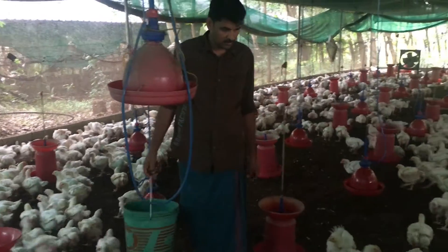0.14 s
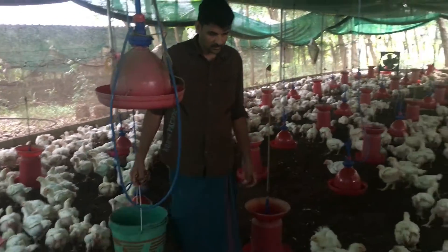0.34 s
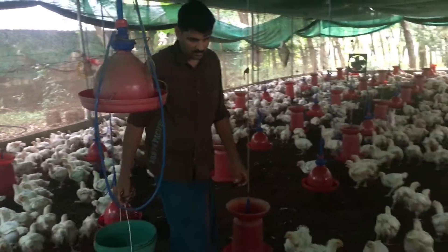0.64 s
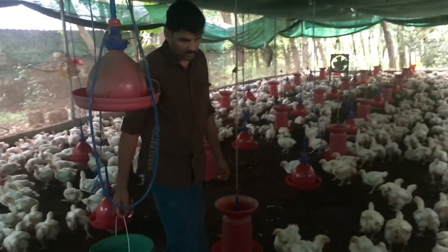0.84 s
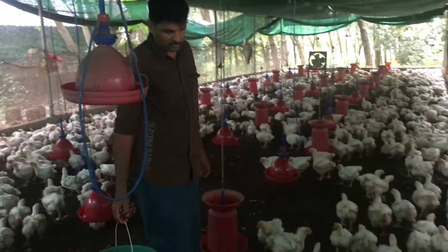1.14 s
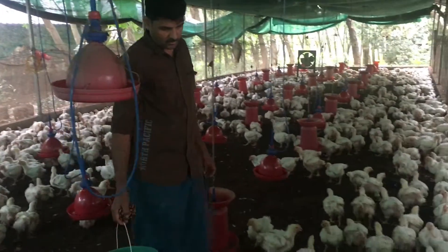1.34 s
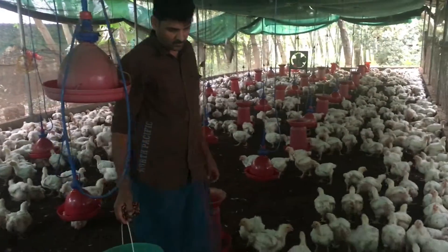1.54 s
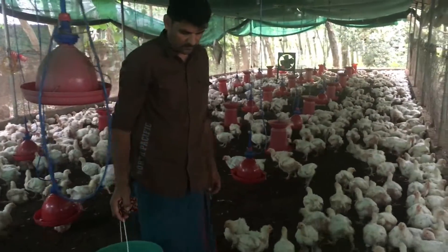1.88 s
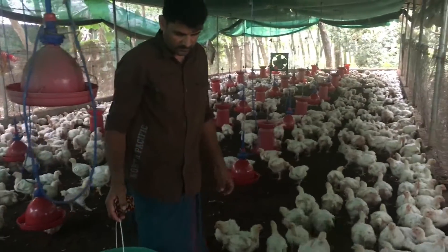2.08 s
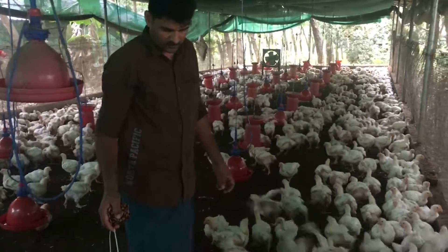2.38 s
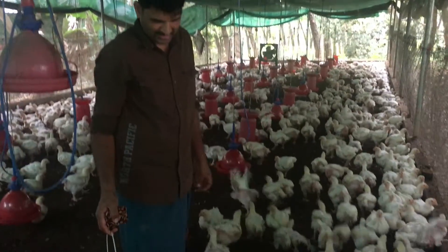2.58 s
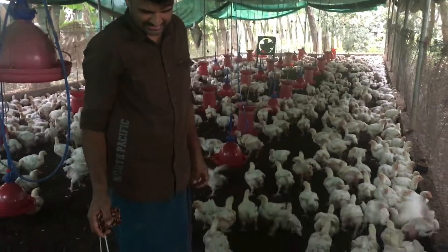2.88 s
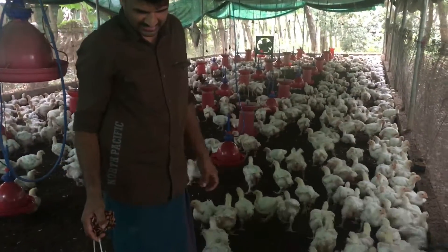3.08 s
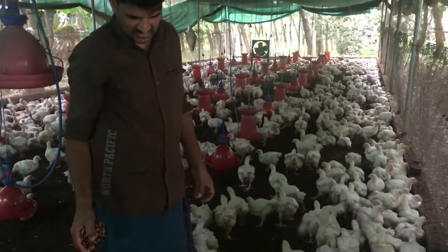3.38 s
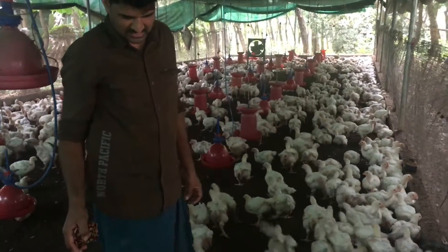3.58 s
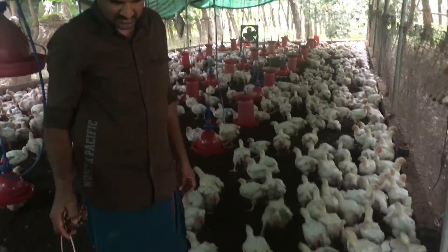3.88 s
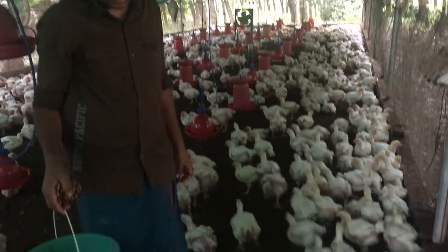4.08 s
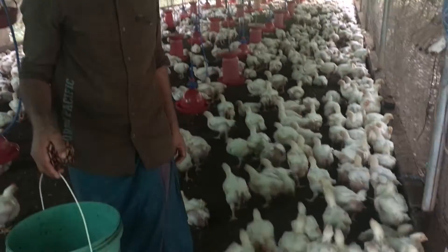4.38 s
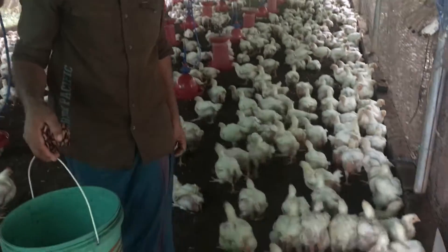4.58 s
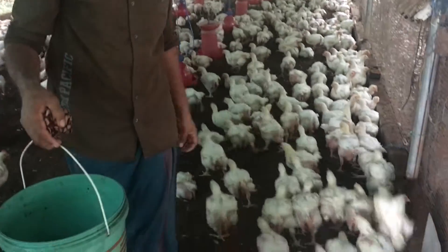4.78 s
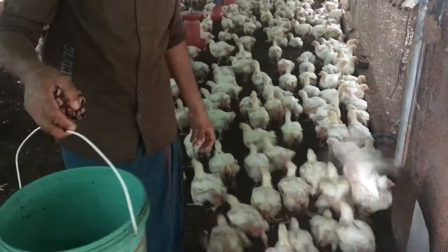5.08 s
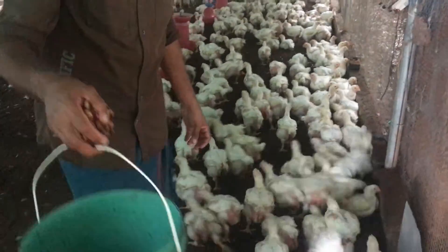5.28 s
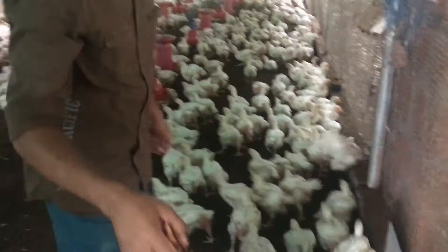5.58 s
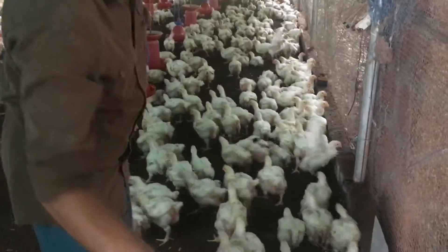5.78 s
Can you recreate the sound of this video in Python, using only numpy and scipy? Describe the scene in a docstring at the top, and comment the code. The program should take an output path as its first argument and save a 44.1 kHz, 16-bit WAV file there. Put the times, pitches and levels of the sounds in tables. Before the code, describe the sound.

A big flock of young chickens peeps in an overlapping chorus, with hoarse squawks, bursts of scuffling feet and wings, and small dry ticks.

```python
"""A large flock of young chickens in an open-sided shed with a litter floor.
Hundreds of short gliding whistles overlap into a chorus; single peeps and harmonic, hoarse
squawks stand above it. Now and then birds scatter, feet and wings scuffling as gritty noise;
litter and feathers crackle, claws and beaks tick. A far wash, low rumble and short echo lie behind."""
import sys
import numpy as np
from scipy import signal
from scipy.fft import rfft, irfft, next_fast_len
from scipy.io import wavfile
from scipy.ndimage import uniform_filter1d

SR = 44100
rng = np.random.default_rng(int(sys.argv[2]) if len(sys.argv) > 2 else 0)


def volts_from_db(level):
    """Convert decibel levels to linear amplitude ratios."""
    exponent = np.asarray(level, float) / 20
    return 10 ** exponent


def wav_record(signal):
    """Record a signal, one row per channel, as 16-bit PCM in the file named by sys.argv[1]."""
    frames = np.transpose(np.atleast_2d(signal))
    bounded = np.clip(frames, -1, 1)
    # unit amplitude maps onto the largest positive 16-bit level
    quanta = np.round(bounded * 32767).astype(np.int16)
    wavfile.write(sys.argv[1], SR, quanta)


N = 261954

# breath noise in the calls, relative density: (frequency [Hz], level [dB])
BREATH_SPECTRUM = [(380, -40), (650, -1), (1000, -22), (1600, 6), (2800, 0), (4500, -26.5), (7000, -18),
                   (12000, -47)]


def evened(x):
    """Scales x to rms 1."""
    return x / np.sqrt(np.mean(x ** 2) + 1e-20)


def spectrum_at(points, hz):
    """Table level in dB at hz, interpolated over log frequency."""
    table_hz, level_db = np.transpose(points)
    return np.interp(np.log(hz + 1), np.log(table_hz + 1), level_db)


def curve(rows, column):
    """One column of a time table at every sample."""
    rows = np.asarray(rows)
    return np.interp(np.arange(N) / SR, rows[:, 0], rows[:, column])


def add(mix, time_s, sound):
    """Adds sound to mix in place from time_s, cut at the end of mix."""
    part = mix[round(time_s * SR):][:len(sound)]
    part += sound[:len(part)]


def coloured(x, points):
    """Shapes x by a spectrum table, then scales it to rms 1."""
    size = next_fast_len(len(x))
    gain = volts_from_db(spectrum_at(points, np.fft.rfftfreq(size, 1 / SR)))
    return evened(irfft(rfft(x, size) * gain, size)[:len(x)])


def wander(count, span_s):
    """Moving average of white noise over span_s: smooth chance of rms 1."""
    size = max(int(span_s * SR), 2)
    return uniform_filter1d(rng.standard_normal(count + size), size)[:count] * np.sqrt(size)


def grit(grains_per_s, spread_db, hiss):
    """Sparse grains of uneven size over a bed of hiss."""
    size = volts_from_db(spread_db * np.minimum(rng.exponential(1, N), 3)) * rng.standard_normal(N)
    grains = size * (rng.random(N) < grains_per_s / SR)
    return evened(grains) + hiss * rng.standard_normal(N)


def peaked(time_s, peak_db, rise_s, fall_s, shape=1):
    """Gain that peaks at time_s, 10 dB down rise_s before and fall_s after; shape 1 = pointed, 2 = round."""
    late_s = np.arange(N) / SR - time_s
    return volts_from_db(peak_db - 10 * np.where(late_s < 0, -late_s / rise_s, late_s / fall_s) ** shape)


def liveliness(column):
    """Gain of the chorus (column 1) or the rustle (2): steady bed and flurries added as power."""
    # steady bed: (time [s], chorus level [dB], rustle level [dB])
    bed = [(0, -34, -50.5), (.75, -32, -50), (1.08, -30, -47.5), (1.34, -32.5, -51), (1.8, -29.5, -44),
           (2.06, -36, -44), (2.23, -31.5, -35.5), (2.65, -24.5, -35.5), (2.72, -41, -48), (2.81, -24, -38),
           (3.065, -31, -40), (3.09, -24, -40), (3.37, -51, -48), (3.72, -48, -53), (4.3, -41.5, -52),
           (4.66, -41, -52), (4.91, -49, -55), (5.94, -44.5, -46)]
    # groups flaring up: (time [s], chorus peak [dB], rustle peak [dB], fall by 10 dB [s])
    flurries = [(.04, -26, -40, 0.08), (.22, -29, -48, .05), (.28, -28, -42, .09), (.48, -30.5, -48.5, .05),
                (.56, -30, -47, .06), (.69, -28, -43, 0.08), (1.19, -29, -42, 0.11),
                (1.63, -29.5, -46.5, .08), (1.9, -26, -27.5, 0.0361), (2.0, -27, -22, 0.03),
                (2.15, -21, -26, 0.0552), (3.3, -34, -41, .06), (3.5, -30, -43, .07),
                (3.66, -31, -60, .035), (3.84, -35.5, -56, 0.15), (4.18, -32, -44, 0.16),
                (4.41, -27, -40.5, 0.05), (4.53, -30.5, -44.5, .06), (4.61, -34, -41, .04),
                (4.73, -31, -44, 0.04), (4.849, -28.5, -60, .035), (5.0, -33, -32, .06),
                (5.07, -33, -34, 0.08), (5.19, -38, -33, 0.02), (5.35, -28, -36, 0.07),
                (5.61, -33.5, -46, 0.08), (5.77, -34, -44.5, 0.1)]
    power = volts_from_db(curve(bed, column)) ** 2
    for row in flurries:
        fall_s = row[3]
        power = power + peaked(row[0], row[column], .7 * fall_s, fall_s, shape=1.6) ** 2
    return np.sqrt(power)


def peep(from_hz, to_hz, length_ms, overtone_db, breath):
    """A gliding, shaky whistle with two overtones and breath, quick to rise and slower to fade."""
    count = int(1.7 * length_ms * SR / 1000)  # room for the faint ends
    u = np.arange(count) / count
    shake = 1 + .018 * wander(count, .005)
    bow = 1 + .05 * (np.sin(np.pi * u) - 1)  # pitch sags 5 % at both ends
    glide_hz = from_hz + (to_hz - from_hz) * u
    phase = 2 * np.pi * np.cumsum(glide_hz * bow * shake) / SR
    overtones = np.sin(2 * phase) + volts_from_db(-10) * np.sin(3 * phase)
    tone = np.sin(phase) + volts_from_db(overtone_db) * overtones
    flutter = 1 + .25 * wander(count, .003)
    envelope = np.sin(np.pi * u ** 0.77) ** 2.06
    return (tone * flutter + breath[:count]) * envelope


def chorus(count=800):
    """Many birds at all distances; most peep low, some higher, a few cluck below."""
    out = np.zeros(N)
    breath = .13 * coloured(rng.standard_normal(N + SR), BREATH_SPECTRUM)
    for when, kind, pitch, glide, length, size, over in rng.random((count, 7)):
        if kind < .25:  # high peep
            pitch_factor, drop_db, fall = 1.6, 4, .76
        elif kind > .86:  # cluck
            pitch_factor, drop_db, fall = .64, 5, .9
        else:
            pitch_factor, drop_db, fall = 1, 0, .76
        hz = (1120 + 750 * pitch ** 1.4) * pitch_factor
        to_hz = hz * (fall + .22 * glide)
        level_db = -3 * np.log(size + 0.031) - drop_db
        call = peep(hz, to_hz, 11 + 30 * length ** 1.5, -4 - 18 * over, breath[int(when * N):])
        add(out, when * N / SR, volts_from_db(level_db) * call)
    # small throats, overtones dulled by distance
    out = signal.lfilter(*signal.butter(3, [620, 3500], "band", fs=SR), out)
    short_rms = np.sqrt(uniform_filter1d(out ** 2, 4500) + 1e-9)
    return liveliness(1) * out / short_rms  # liveliness alone sets the loudness


def near_peeps():
    """Single peeps that stand out; low ones are reedy, high ones purer. A few high rows sound together with a
    near cry, as extra lines above its harmonics."""
    # (time [s], level [dB], glide from [Hz], glide to [Hz] (both before the bow), nominal length [ms])
    peeps = [(.092, -11, 1470, 1420, 16), (.113, -12, 1440, 1400, 6), (0.127, -18, 1560, 1320, 12.5),
             (.212, -22, 1260, 1220, 9), (.285, -22, 1900, 1700, 14), (0.261, -17, 1440, 1390, 8.4),
             (0.466, -23.5, 1302, 1574, 31), (0.563, -25.5, 2406, 2290, 23), (0.685, -26, 1570, 1450, 22),
             (.708, -25, 1180, 1080, 20), (0.974, -27, 2274, 1820, 35), (1.078, -25, 1160, 1200, 16),
             (1.181, -20.5, 1216, 1224, 31), (1.525, -28, 1385, 1158, 58), (1.826, -25.5, 1220, 1183, 29),
             (1.892, -12.5, 2430, 2240, 15.5), (1.89, -19, 1860, 1850, 17), (2.262, -24, 2650, 2450, 25),
             (2.272, -22, 2000, 1900, 30), (2.326, -22, 1307, 1600, 45), (2.424, -21, 1622, 1360, 27),
             (2.68, -23, 2050, 2250, 16), (2.762, -23, 1950, 1950, 10), (2.793, -16, 1620, 1500, 26),
             (2.835, -18, 1324, 1514, 20), (2.864, -24, 1407, 1486, 31), (2.905, -18, 1350, 1250, 18),
             (2.985, -19, 1450, 1230, 26), (3.062, -24, 2050, 2180, 12), (3.113, -21, 3350, 3120, 12),
             (3.336, -19.5, 1450, 1344, 27.6), (3.41, -26, 1350, 1330, 22), (3.46, -25, 2550, 2600, 20),
             (3.471, -19, 1314, 1496, 25), (3.633, -26.5, 1098, 1370, 18), (3.678, -25, 1750, 1600, 14),
             (3.757, -26, 1435, 1294, 29), (3.835, -24.5, 1805, 1670, 15.6), (3.927, -16.5, 1467, 1544, 25),
             (4.206, -22.5, 2703, 3050, 19.7), (4.208, -19.5, 1668, 1864, 31.4),
             (4.213, -15.5, 1494, 1544, 11.2), (4.356, -25, 1277, 1263, 32), (4.394, -23.5, 2730, 2856, 19),
             (4.523, -19.5, 1357, 1355, 15.6), (4.719, -21, 1395, 1414, 13.3),
             (4.835, -21.5, 1226, 1150, 22), (4.963, -18.5, 3050, 3500, 33), (4.985, -23, 2750, 2650, 14),
             (5.058, -19, 1240, 1290, 14), (5.185, -24, 2120, 1950, 22), (5.218, -20, 1420, 1380, 9),
             (5.22, -22, 1740, 1680, 9), (5.285, -25, 1800, 1760, 12), (5.362, -17.5, 1790, 1720, 7),
             (5.401, -14, 1180, 1060, 9), (5.436, -22, 2983, 2790, 17), (5.485, -24, 1870, 1925, 16.6),
             (5.53, -29, 1660, 1640, 28), (5.597, -22, 1087, 1026, 13), (5.634, -27, 1174, 1120, 12.3),
             (5.665, -28, 1850, 1750, 18), (5.755, -27, 2050, 1950, 14)]
    out = np.zeros(N)
    breath = .25 * coloured(rng.standard_normal(N), BREATH_SPECTRUM)
    for time_s, level_db, from_hz, to_hz, length_ms in peeps:
        overtone_db = -13.5 - 18 * np.log2(from_hz / 1310)  # -18 dB per octave of pitch
        own_breath = np.roll(breath, -round(time_s * SR))[:SR // 5]
        call = peep(from_hz, to_hz, length_ms, overtone_db, own_breath)
        add(out, time_s - .3 * length_ms / 1000, volts_from_db(level_db) * call)
    return out


def squawk(length_s, top_at, top_db, top_hz, top_rough, top_bright_db, open_hz, lift_db, dull_db):
    """A harmonic cry through the throat; roughness shakes pitch and level, adds half lines and breath."""
    # throat response: (frequency [Hz], level [dB])
    throat = [(350, -60), (600, -3), (785, -6), (1060, -14), (1500, 2), (2200, -11), (3410, -18.5),
              (3900, -13.5), (4650, -26), (6960, -19), (7650, -24), (15000, -35)]
    t = np.arange(0, length_s, 1 / SR)
    count = len(t)
    u = t / length_s - top_at  # 0 where the cry tops out
    before, after = -u / top_at, u / (1 - top_at)

    def arch(first, top, last):
        """Straight climb to the top, held there before it sags."""
        return top + np.where(u < 0, (first - top) * before, (last - top) * abs(after) ** 1.8)

    effort_db = top_db + arch(-2.5, 0, -7.5)
    bright_db = top_bright_db + dull_db * np.clip(after, 0, 1)
    hz = top_hz * arch(.97, 1, .915)
    rough = np.clip(top_rough + arch(.25, 0, 0.046), 0, 1)
    beak_hz = arch(2950, open_hz, 0.93 * open_hz)
    jitter = .022 * wander(count, .004) + .02 * wander(count, .025)
    cycles = np.cumsum(hz * (1 + rough * jitter)) / SR

    k = np.arange(2, 40)[:, None] / 2  # harmonics and the half lines between them
    line_hz = k * hz
    gain = volts_from_db(spectrum_at(throat, line_hz) + bright_db * np.clip((line_hz - 1900) / 1700, 0, 1))
    # the open beak lifts the partials near its resonance
    gain *= volts_from_db(lift_db * np.exp(-((line_hz - beak_hz) / 1050) ** 2))
    # strong and weak pulses alternate in a rough cry
    half = .8 * rough ** 2 * np.clip(line_hz / 2500, 0, 1) ** 2
    gain *= np.where(k % 1, half, 1)
    # high or hoarse partials swell and fade unevenly
    gain *= volts_from_db([(np.minimum(n, 3.0) + 4 * top_rough ** 2) * wander(count, .015) for n in k])

    partials = gain * np.cos(2 * np.pi * (k * cycles + rng.random(k.shape)))
    voice = partials.sum(0) / np.sqrt((gain ** 2).sum(0) / 2)
    # a hoarse cry breaks up
    voice *= (1 + .5 * rough * wander(count, 0.00248)) * volts_from_db(2.5 * rough * wander(count, .009))
    breath = .5 * rough * coloured(rng.standard_normal(count), BREATH_SPECTRUM)
    return volts_from_db(effort_db) * (voice + breath) * signal.windows.tukey(count, .1 + .3 * top_rough)


def squawks():
    """Near cries, each with its own pitch, roughness and beak opening."""
    # (start [s], length [s], top position [share of length], effort [dB], top pitch [Hz],
    #  roughness at top [0-1], brightness [dB], beak resonance [Hz], its lift [dB],
    #  brightness change by the end [dB])
    cries = [(.018, .107, .1, -18, 756, .06, 0, 3500, 10, -30),
             (1.976, .062, .3, -11, 771.7, 0.1, 1, 6600, 9, -12.5),
             (2.125, 0.075, .35, -19, 730.5, .5, 4, 5800, 13, -12.5),
             (2.533, .07, .3, -20, 745, .75, -2, 2500, 7, -2),
             (2.575, .105, .25, -21, 775, .85, 1, 5500, 11, -6),
             (2.893, .095, .2, -24, 692, .8, 7, 4300, 7, -10),
             (3.128, .064, .45, -17, 778, .35, -4, 2900, 19, -6),
             (3.19, .07, .3, -24, 740, .7, 2, 3700, 11, -6),
             (3.258, .105, .2, -29, 725, .65, 5, 3700, 12, -4),
             (4.99, .243, .45, -22, 724, .27, -3, 4200, 9, -6),
             (5.261, 0.034, .25, -27, 619, .45, 3, 3080, 11, -12.5),
             (5.381, 0.039, .2, -23, 600, .4, 0, 2950, 9, -12.5)]
    out = np.zeros(N)
    for start_s, *settings in cries:
        add(out, start_s, squawk(*settings))
    return out


def scuffles():
    """Feet and wings beat the litter: lumpy, gritty noise, strongest in the low middle."""
    # birds scattering close by: (time [s], peak [dB], rise by 10 dB [s], fall by 10 dB [s])
    bursts = [(2.3, -25, 0.02, 0.11), (2.412, -19.5, 0.0873, 0.1148), (3.081, -12.5, .003, .09),
              (3.215, -20, .04, .07), (3.476, -24.5, .03, 0.11), (4.15, -30, .012, .015),
              (5.122, -26, .005, .1), (5.4, -33, .1, .1)]
    # relative density: (frequency [Hz], level [dB])
    spectrum = [(35, -45), (60, -29), (165, -5), (448, -11), (633, -3.5), (1520, -6), (4950, -28),
                (6380, -33), (15000, -39.5)]
    level = sum(peaked(*row) for row in bursts)
    lumps = volts_from_db(2.5 * wander(N, .006))
    noise = coloured(lumps * grit(2500, 2.8, 0.8), spectrum)
    return uniform_filter1d(level, 100) * noise


def ticks():
    """Claws and beaks on hard things: each tick is a sharp snap with a short noisy tail."""
    # (time [s], level [dB])
    hits = [(0.0903, -24), (1.8466, -18.5), (1.928, -26), (2.0773, -19.5), (2.1217, -18), (2.244, -23),
            (2.3261, -22), (2.4367, -20.5), (2.7526, -29), (2.898, -24), (3.044, -23), (3.0748, -12),
            (3.378, -30), (3.5122, -25.5), (4.694, -27), (5.7328, -28), (5.8408, -19)]
    out, t = np.zeros(N), np.arange(900) / SR
    fade = volts_from_db(-60 * t / .007) + .12 * volts_from_db(-60 * t / .04)
    band = signal.butter(1, [1200, 12000], "band", fs=SR)
    for time_s, level_db in hits:
        snap = rng.standard_normal(len(t)) * fade
        add(out, time_s, volts_from_db(level_db) * signal.lfilter(*band, snap))
    return out


def rustle():
    """Dry litter and feathers crackle finely in the treble, each in its own lumps."""
    # litter, feathers; relative density of each: (frequency [Hz], level [dB])
    spectra = [
        [(1500, 2.5), (3000, 5), (4300, 0), (5100, -6), (6800, 0.5), (7800, -12), (15500, -40)],
        [(5000, -40), (7600, -8), (9300, -4), (10600, -11), (12000, -9), (15500, -18)],
    ]
    litter, feathers = (coloured(volts_from_db(3.0 * wander(N, .018)) * grit(1500, 2.2, 1.25), spectrum)
                        for spectrum in spectra)
    return liveliness(2) * (litter + volts_from_db(-10) * feathers)


def far_flock():
    """The far end of the flock blurred to a noise wash that follows the chorus, compressed."""
    # relative density: (frequency [Hz], level [dB])
    spectrum = [(350, -42), (560, -8), (780, 2), (1020, -5), (1450, 6), (2850, -3.5), (5000, -43),
                (15500, -53)]
    swell = evened(liveliness(1) ** .7)
    return volts_from_db(-37.5) * swell * coloured(rng.standard_normal(N), spectrum)


def rumble():
    """Uneven low noise of the shed in two bands, each with its own wandering level."""
    # (time [s], upper part level [dB], bass level [dB])
    levels = [(0, -49, -52), (.8, -48, -50), (1.0, -46, -43), (1.7, -47, -44), (2.22, -40, -43),
              (2.3, -34, -38), (2.6, -41, -45), (3.1, -35, -41), (3.7, -46, -48), (4.9, -44, -48),
              (5.12, -39, -43), (5.94, -45, -50)]
    upper = coloured(rng.standard_normal(N), [(90, -30), (140, -2), (190, 0.5), (260, -5), (350, -5),
                                              (450, -24), (800, -37)])
    bass = coloured(rng.standard_normal(N), [(20, -44), (42, -0.5), (70, 0.5), (120, 1), (170, -25),
                                             (400, -60)])
    upper_db = curve(levels, 1) + 2.2 * wander(N, .06)
    bass_db = curve(levels, 2) + 1.5 * wander(N, .08)
    return volts_from_db(upper_db) * upper + volts_from_db(bass_db) * bass


def shed_echo(x, t60_s):
    """Sparse taps of random sign dying fast: roof and floor reflect, the open sides let sound out."""
    at = np.arange(200, SR // 3, 20)
    taps = np.zeros(SR // 3 + 20)
    sign = rng.choice([-1., 1.], at.shape)
    taps[at + rng.integers(0, 20, at.shape)] = sign * volts_from_db(-60 * at / SR / t60_s)
    taps = signal.lfilter([.5], [1, -.5], taps)  # dulls the treble
    return signal.oaconvolve(x, taps / np.linalg.norm(taps))[:N]


def scene():
    """Mono mix; only the near sounds and the chorus feed the echo."""
    flock = chorus()
    near = near_peeps() + squawks() + scuffles() + ticks()
    echo = shed_echo(volts_from_db(-11) * near + volts_from_db(-9) * flock, t60_s=.15)
    return (flock + near + echo + rustle() + far_flock() + rumble())[None]


def low_pass(x):
    """Removes everything above the highest recorded frequency."""
    return signal.sosfilt(signal.butter(12, 16490, fs=SR, output="sos"), x)


def record(dry):
    """Rounds off the loudest peaks, then limits the band to 15.9 kHz."""
    rounded = .8 * np.tanh(dry / .8)
    lowpass = signal.firwin(511, 15900, window=("kaiser", 9), fs=SR)
    finished = signal.oaconvolve(rounded, lowpass[None], "same")
    return low_pass(finished)


dry = scene()
out = record(dry)
wav_record(out)
```